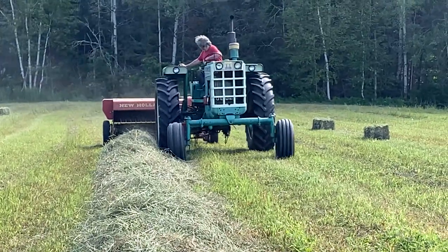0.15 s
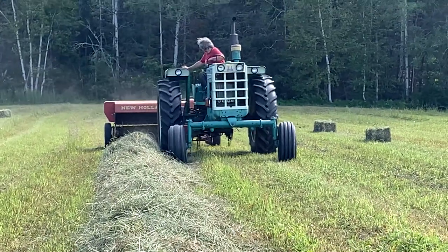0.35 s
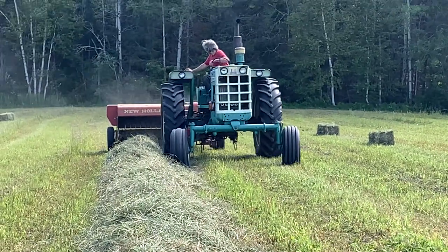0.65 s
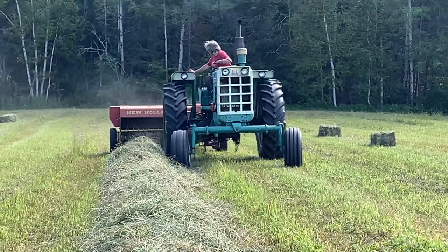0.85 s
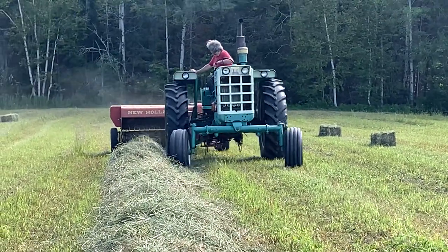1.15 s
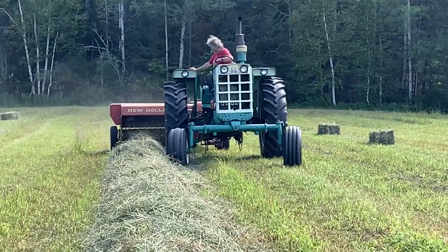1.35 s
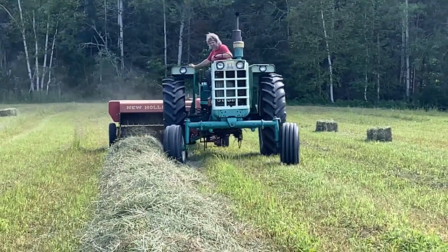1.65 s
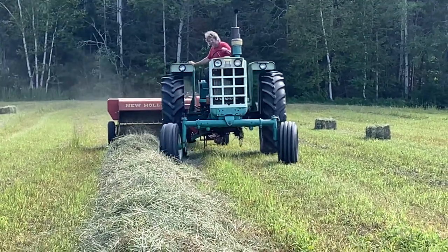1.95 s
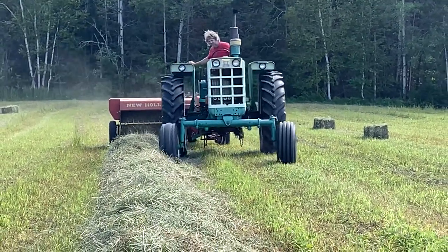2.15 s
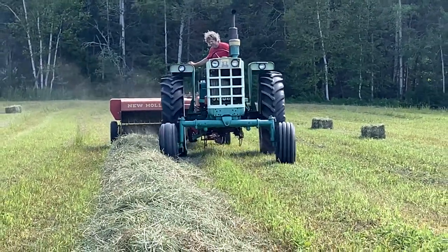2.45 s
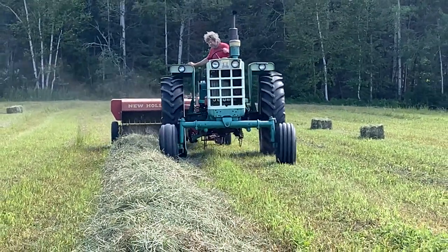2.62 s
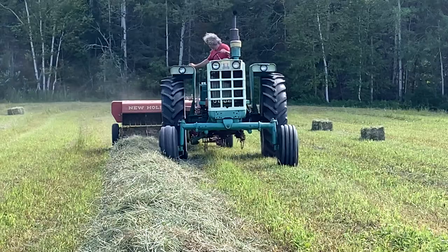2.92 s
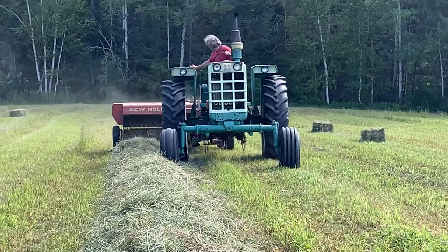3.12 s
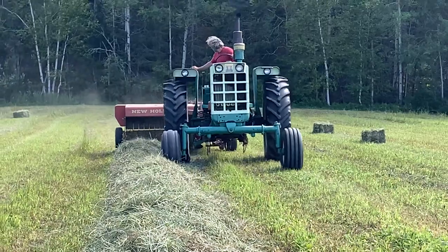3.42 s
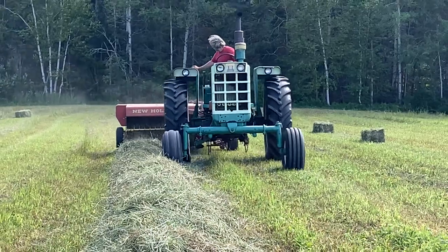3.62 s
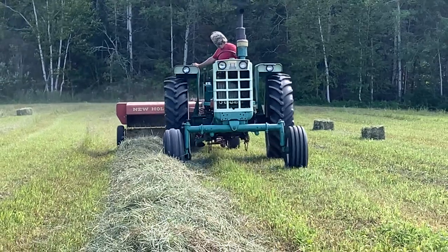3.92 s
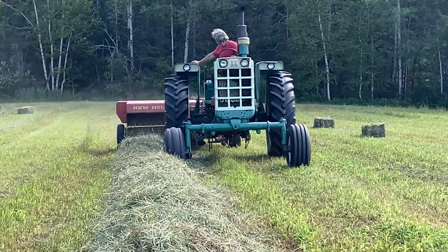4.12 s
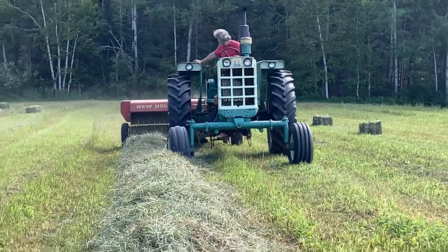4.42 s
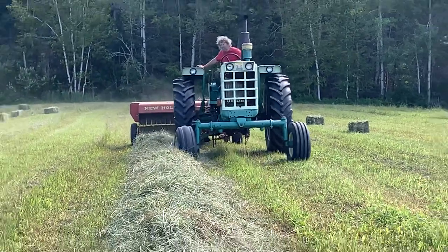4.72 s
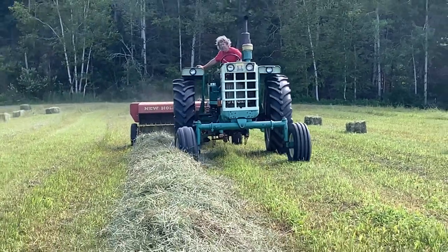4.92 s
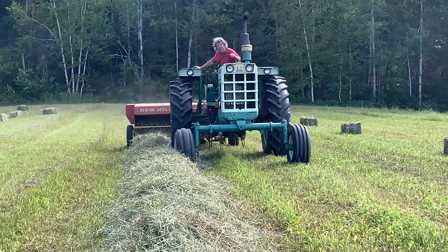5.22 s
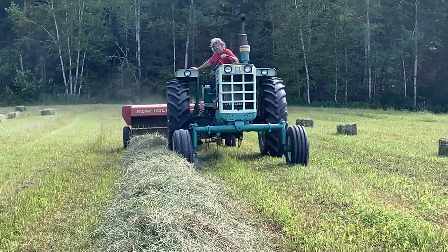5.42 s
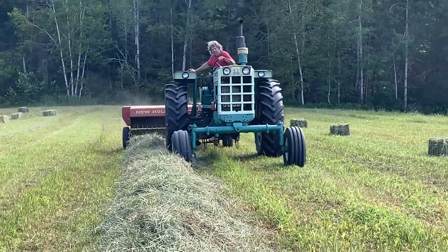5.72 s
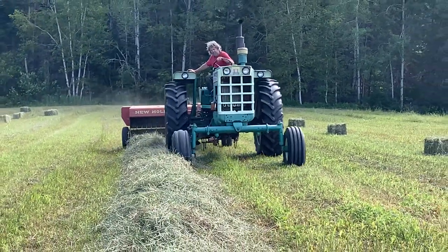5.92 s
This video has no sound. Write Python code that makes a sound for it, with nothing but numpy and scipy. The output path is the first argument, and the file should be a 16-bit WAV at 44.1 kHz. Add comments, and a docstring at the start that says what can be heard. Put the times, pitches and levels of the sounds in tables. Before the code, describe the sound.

Outdoors in an open hay field, a six-cylinder tractor approaches a fixed stereo microphone, swelling steadily. Its low, beating drone sags briefly with each baler plunger stroke, about every 1.2 seconds. Puffing exhaust, valve clatter, gear whine and a buzzing metal guard cover a fine dry hay rustle and ticking chains. Steel clacks become stronger near the end, as soft wind thumps the microphone.

```python
"""A six-cylinder tractor nears the microphone across a hay field, driving a square baler.
Plunger strokes sag the crank speed; exhaust sines beat against fan sines, shaped noise makes puffs and clatter.
Gear sines, a buzzing guard and singing drive gears join in; low noise makes the wheels thud.
Filtered noise forms the pickup's rustle, chain ticks and steel rattles; late on, a breeze buffets the microphone."""
import sys
import numpy as np
from scipy import signal
from scipy.fft import rfft, irfft, next_fast_len
from scipy.io import wavfile
from scipy.ndimage import map_coordinates

SR = 44100
rng = np.random.default_rng(int(sys.argv[2]) if len(sys.argv) > 2 else 0)


def dump_mix(stems):
    """Bounce the given channels to the path in sys.argv[1] as a 16-bit WAV at rate SR."""
    frames = np.atleast_2d(stems).T  # one column per channel
    limited = np.clip(frames, -1, 1)  # hard clip at full scale
    pcm = np.round(limited * 32767).astype(np.int16)
    wavfile.write(sys.argv[1], SR, pcm)


N = 267687

FREE_RPM = 1806.3
PRESS_S = .185  # 1/e half-width of a stroke
FEED_AFTER_S, FEED_S, FEED_SAG_RPM = .5, .19, 35.92

# plunger strokes, about 49 a minute: (time [s], speed sag [rpm], gear song re clatter [dB])
PLUNGER_STROKES = [(-.51, 74, -6), (.707, 75.76, -4.5), (1.927, 71.94, -5.5), (3.148, 75.22, -4),
                   (4.368, 82.1, -3.5), (5.586, 67.95, -10)]


def engine_speed():
    """Crankshaft rpm: each plunger stroke and the feed after it drag it below the governed speed."""
    sag_rpm = 0
    for time_s, stroke_rpm, _ in PLUNGER_STROKES:
        sag_rpm += stroke_rpm * swell(time_s, PRESS_S)
        sag_rpm += FEED_SAG_RPM * swell(time_s + FEED_AFTER_S, FEED_S)
    return FREE_RPM - sag_rpm


# exhaust lines: (multiple of the four-stroke cycle [-], nominal level re firing line [dB])
EXHAUST_LINES = [(4, -35), (5, -33.5), (6, 0.5), (7, -24.5), (8, -25), (9, -9), (11, -24), (12, -25.5),
                 (15, -25.5), (18, -33.5), (20, -31.5), (23, -42.5)]
# belt-driven fan: (blade passes per cycle [-], level re firing line [dB])
FAN_LINES = [(8.82, -8.5), (17.64, -26), (35.28, -40)]


def drone(cycle, drone_db, fan_lead_turns=0.32, shake=0.015, line_fade_db=1.5):
    """Exhaust harmonics, weak ones fading as the cylinders share the load; the fan beats against the ninth."""
    turn = 2 * np.pi * cycle
    pipe = 0
    for multiple, db in EXHAUST_LINES:
        steady = round(multiple) in (6, 9)
        fade_db = 0 if steady else line_fade_db * wobble(5)
        pipe += amp(db + fade_db) * np.sin(round(multiple) * turn)
    fan = sum(amp(db) * np.sin(passes * turn + 2 * np.pi * fan_lead_turns) for passes, db in FAN_LINES)
    return np.sqrt(2) * amp(drone_db) * (pipe + fan) * (1 + shake * wobble(15))


# exhaust puff spectrum: (frequency [Hz], relative density [dB per Hz])
PUFF_SPECTRUM = [(20, -34), (30, -27), (45, -16), (70, -5), (110, 1), (180, 0.5), (260, -3), (310, -10.5),
                 (390, -24.5), (700, -50)]


def puffs(cycle, puff_db, depth=0.56, gust_db=0.4):
    """Turbulent gas leaves the stack, pulsing with each of the six firings per cycle."""
    gas = noise() * (1 + depth * np.cos(2 * np.pi * 6 * cycle))
    jet = filtered(gas, spectrum(PUFF_SPECTRUM))
    return amp(puff_db) * unit(amp(gust_db * wobble(10)) * jet)


# engine block and bonnet: (frequency [Hz], relative density [dB per Hz])
BLOCK_SPECTRUM = [(150, -22), (390, -8), (530, -1), (780, 1), (1000, 0.5), (1400, 1.5), (1680, -1),
                  (1850, -4.5), (2020, -13.5), (2130, -6.5), (2400, -7.5), (2650, -10.5), (3400, -17.5),
                  (5200, -19.5), (16000, -59)]
# ringing panels: (frequency [Hz], width [Hz], level re block [dB])
PANEL_MODES = [(792, 24, -8.5), (1055, 11, -6.5), (1638, 27, -8)]


def clatter(cycle, load, clatter_db, loose_db=0.0, repeat_db=-15.5, drift_rad=0.73):
    """Slowly changing valve and piston ticks, loose knocks and gears ring the block and panels."""
    blend_rad = drift_rad * wobble(1.56)
    strikes = amp(loose_db + .5 * load) * noise()
    ticks = np.cos(blend_rad) * valve_pattern(cycle) + np.sin(blend_rad) * valve_pattern(cycle)
    strikes[0] += amp(repeat_db) * ticks
    strikes *= knocks(cycle)
    strikes[0] += gear_whine(cycle)
    body = spectrum(BLOCK_SPECTRUM, PANEL_MODES)
    return amp(clatter_db) * unit(ground_dip(filtered(strikes, body)))


def valve_pattern(cycle, size=8192):
    """A fine random rattle that repeats every four-stroke cycle."""
    lines = np.exp(2j * np.pi * rng.random(size // 2 + 1))
    # timing scatter weakens the high lines
    lines /= np.hypot(1, (np.arange(len(lines)) / 170) ** 2)
    return unit(np.interp(cycle % 1, np.arange(size) / size, irfft(lines), period=1))


# six cylinders in firing order: (nominal knock strength re steady clatter [-])
CYLINDER_KNOCKS = [1.3, .95, .55, .85, .3, .35]


def knocks(cycle, knock_s=0.003):
    """Each firing jolts the block as hard as its cylinder does, then the jolt decays exponentially."""
    count = len(CYLINDER_KNOCKS)
    firing, part = np.divmod(count * cycle, 1)
    since_s = part / np.gradient(count * cycle) / SR
    strength = np.take(CYLINDER_KNOCKS, firing.astype(int), mode="wrap") * amp(2.5 * wobble(90))
    return unit(1 + strength * np.exp(-since_s / knock_s))


# gears and valve train: (multiple of the cycle [-], nominal level re loose knocks [dB])
GEAR_LINES = [(30, -31), (33, -31), (36, -29), (37, -35), (39, -34), (40, -22.5), (42, -34.5), (44, -31),
              (48, -30), (50, -27), (52, -30), (53, -36), (54, -26.5), (55, -35), (58, -28), (59, -29.5),
              (62, -26), (63, -27.5), (66, -31.5), (69, -31.5), (71, -27.5), (72, -25.5), (74, -28.5),
              (75, -24.5), (82, -28), (84, -32.5), (86, -31), (87, -27), (90, -33.5), (93, -36),
              (108, -27.5), (111, -27), (117, -30)]


def gear_whine(cycle, fade_db=2.5, fade_rate_hz=2.96, backlash_cycles=0.001):
    """Meshing teeth sing on cycle multiples; backlash blurs high lines, each fades as the tractor rocks."""
    whine = 0
    for multiple, db in GEAR_LINES:
        shaken = cycle + backlash_cycles * wobble(22)
        tone = np.sin(2 * np.pi * (round(multiple) * shaken + rng.random()))
        whine += amp(db + fade_db * wobble(fade_rate_hz)) * tone
    return np.sqrt(2) * whine


def ground_dip(x, dip_hz=520, width_hz=520, far=.3, near=-.15):
    """The reflection off the stubble thins the low mids from afar and lifts them close by."""
    return x - np.linspace(far, near, N) * filtered(x, lambda f: resonance(f, dip_hz, width_hz))


# loose guard's spells: (time [s], level re clatter [dB])
BUZZ_SPELLS = [(0, -22), (.42, -26), (.6, -10), (1, -16), (1.22, -5), (1.5, -20), (1.95, -11), (2.3, -13),
               (4.2, -22), (4.4, -10), (4.88, -8), (5.2, -14), (5.5, -13), (5.98, -10), (6.07, -6)]


def buzz(clatter_db, ring_hz=1103, waver_hz=5, flutter_db=2):
    """A loose sheet-metal guard sings on one wavering note."""
    turn = 2 * np.pi * np.cumsum(ring_hz + waver_hz * wobble(25)) / SR
    return amp(clatter_db + curves(BUZZ_SPELLS)) * unit(np.sin(turn) * amp(flutter_db * wobble(14)))


def driveline(clatter_db, ring_hz=1210, width_hz=32):
    """The loaded drive gears sing whenever the plunger presses the bale."""
    press = sum(amp(db) * swell(time_s, PRESS_S) for time_s, _, db in PLUNGER_STROKES)
    song = filtered(noise(), lambda f: resonance(f, ring_hz, width_hz) ** 2)
    return amp(clatter_db) * press * unit(song)


# ground rumble: (frequency [Hz], relative density [dB per Hz])
GROUND_SPECTRUM = [(18, -38), (28, -17), (42, 7), (55, 11.5), (75, 22), (110, 2), (180, 14), (350, -51)]
# wheels drop into ruts: (time [s], level re steady rolling [dB])
WHEEL_RUTS = [(2.27, 6), (4.16, 3)]


def rolling(rolling_db, bump_db=2.5, rut_s=0.071):
    """The heavy wheels thud unevenly over the stubble, harder in the ruts."""
    bumps = noise() * amp(bump_db * wobble(11))
    rut_db = sum(db * swell(time_s, rut_s) for time_s, db in WHEEL_RUTS)
    return amp(rolling_db + rut_db) * unit(filtered(bumps, spectrum(GROUND_SPECTRUM)))


# dry stalks: (frequency [Hz], relative density [dB per Hz])
STALK_SPECTRUM = [(800, -20), (2600, -12), (4000, -4), (5300, -9), (6300, -3.5), (7000, -.5), (7600, .3),
                  (8200, -1.5), (8700, 0), (9400, -.5), (10700, -4), (12300, -3), (14300, -10.5),
                  (16000, -10)]
# pickup's spring tines: (frequency [Hz], width [Hz], level re rustle [dB])
TINE_MODES = [(4980, 120, -7), (6000, 200, -6), (6850, 90, -7), (7030, 50, -4), (7300, 200, -12),
              (11800, 80, -9)]
# windrow thick and thin: (time [s], level [dB])
WINDROW_LEVEL = [(0, 0.5), (.35, 3), (1.1, 1.5), (1.4, -0.5), (1.8, 1.5), (2.7, 0), (3.1, 2), (3.45, 1.5),
                 (3.7, -0.5), (4.4, -0.5), (5.2, -0.8), (5.55, 0.5), (6.07, 1.5)]


def hay(hay_db, grain_db=1.2, clump_db=1.23, snaps_db=-15, snap_rate_hz=220):
    """Ringing tines comb the windrow: a dense rustle with single stalks snapping in it."""
    rustle = unit(noise() * amp(grain_db * wobble(1400) + clump_db * wobble(45)))
    snaps = (rng.random(N) < snap_rate_hz / SR) * noise()
    ringing = steel_ring(rustle + amp(snaps_db) * unit(snaps))
    combed = filtered(ringing, spectrum(STALK_SPECTRUM, TINE_MODES))
    return amp(hay_db + curves(WINDROW_LEVEL)) * unit(combed)


# baler's chains and sheet steel: (frequency [Hz], relative density [dB per Hz])
STEEL_SPECTRUM = [(1200, -25), (2200, -7), (2600, -12), (2950, -5), (3250, 2), (3500, 0), (3900, -3),
                  (4450, -2), (4750, -9), (5300, -18), (6400, -20), (12000, -35)]


def chains(chain_db, link_db=2.0, slap_db=0.9):
    """Chain links and feeder forks tick densely against the baler's sheet steel."""
    ticks = noise() * amp(link_db * wobble(500) + slap_db * wobble(45))
    return amp(chain_db) * unit(filtered(steel_ring(ticks), spectrum(STEEL_SPECTRUM)))


# tines and feeder, with the plunger's knocks as the low rows near 1 kHz: (time [s], level before attack and
# decay [dB], ring [Hz], width [Hz], attack [s], t60 [s])
STEEL_RATTLES = [(.315, -56, 9500, 4000, .005, .2), (.61, -56, 6000, 3000, .005, .15),
                 (.79, -58, 6000, 1500, .003, .1), (1.05, -48, 9000, 4500, .012, .22),
                 (1.17, -54, 9500, 4000, .005, .15), (1.745, -48, 9900, 2500, .006, .17),
                 (2.245, -47, 9000, 7000, .003, .1), (2.27, -44, 4500, 3000, .006, .14),
                 (2.516, -35, 980, 1100, 0.0044, 0.19), (2.555, -45, 4300, 3000, .006, .25),
                 (2.861, -47, 6500, 3000, .003, .12), (3.13, -43, 4100, 1300, .005, 0.18),
                 (3.165, -48, 4000, 1800, .005, .2), (3.415, -46, 10200, 4000, .012, .26),
                 (3.51, -54, 10000, 4000, .003, .12), (4.20, -52, 6050, 900, .015, .9),
                 (4.298, -38, 3400, 1300, 0.0046, 0.22), (4.305, -47, 6000, 3000, .004, .2),
                 (4.41, -51, 6000, 700, 0.0047, 0.16), (4.47, -35, 3470, 1600, .009, .2),
                 (4.515, -44, 3900, 2500, .004, .2), (4.82, -37, 1200, 1200, .004, .12),
                 (4.84, -45, 9000, 4000, .005, .13), (5.484, -30.5, 3360, 2000, 0.0022, 0.083),
                 (5.484, -42, 10000, 6000, .005, .22), (5.505, -29, 1200, 1100, 0.0044, 0.18),
                 (5.518, -34, 3800, 3000, .001, 0.051), (5.586, -42, 4700, 900, .002, .08),
                 (5.608, -41, 4650, 700, .002, .1), (5.715, -41, 6600, 4500, 0.0036, 0.11),
                 (5.968, -31, 1120, 1000, .003, 0.12), (5.972, -42, 4400, 900, .002, .15),
                 (5.982, -35, 7200, 1500, .007, 0.15), (5.984, -39, 10500, 4000, .005, .15)]


def rattles(jolt_db=1.5):
    """Loose steel parts clack and chatter in uneven jolts, each with its own band and decay."""
    out = np.zeros((2, N + SR))
    t = np.arange(SR // 2) / SR
    f = np.fft.rfftfreq(len(t), 1 / SR)
    jolts = steel_ring(noise() * amp(jolt_db * wobble(900)))
    jolts = np.pad(jolts, [(0, 0), (0, SR)], mode="wrap")
    for time_s, db, ring_hz, width_hz, attack_s, t60_s in STEEL_RATTLES:
        start = round(time_s * SR)
        span = slice(start, start + len(t))
        band = resonance(f, ring_hz, width_hz) ** 2
        chatter = unit(irfft(rfft(jolts[:, span]) * band, len(t)))
        out[:, span] += chatter * amp(db - 60 * t / t60_s) * (1 - np.exp(-t / attack_s))
    return out[:, :N]


def steel_ring(x, t60_s=.07, ring_db=-10):
    """Each tick leaves a short decaying tail of countless close modes in the steelwork."""
    t = np.arange(SR // 8) / SR
    tail = rng.standard_normal(len(t)) * amp(-60 * t / t60_s)
    tail /= np.linalg.norm(tail)
    return x + amp(ring_db) * signal.fftconvolve(x, tail[None], axes=1)[:, :N]


# wind on the ports: (frequency [Hz], relative density [dB per Hz])
BUFFET_SPECTRUM = [(18, -40), (30, -22), (55, 4), (90, 1.5), (140, 4), (220, -13), (350, -31), (600, -45),
                   (1500, -60), (4000, -100)]
# breeze, stronger in the second half: (time [s], level re wind_db [dB])
BREEZE_GUSTS = [(0, -30), (3.3, -15), (3.55, -10), (4, -10), (4.2, -12), (4.3, -10), (4.39, 5), (4.49, -13),
                (5.08, -7), (5.2, 4.5), (5.35, -8), (5.52, 5), (5.82, 0), (6.07, -2)]


def wind(wind_db=-33.0, lump_db=1.0):
    """A rising breeze buffets each microphone port on its own, in soft lumps."""
    eddies = filtered(noise(), spectrum(BUFFET_SPECTRUM))
    lumps = amp(lump_db * np.array([wobble(15), wobble(16)]))
    return amp(wind_db + curves(BREEZE_GUSTS)) * unit(eddies * lumps)


# port pair: (frequency [Hz], likeness [0-1], left phase lead [rad], left minus right [dB])
PORT_PAIR = [(30, .95, 0, 0), (85, .99, .08, -1.6), (135, .99, .12, -1.4), (280, .99, 0, 1.8),
             (400, .99, 0, -.7), (620, .94, .1, -7), (860, .93, .6, -3), (1200, .91, .25, 0),
             (1850, .94, .5, -1), (2250, .9, 1.8, -4), (2560, .9, 2.7, 0), (2800, .83, 1.7, -1),
             (3300, .82, 2.15, 0), (4150, .74, 1.1, -1.7), (5000, .75, 2, 0), (6000, .75, .3, -1),
             (7000, .8, -1.1, 0), (7900, .92, -2.8, 0), (8700, .92, -3.2, 0), (10500, .89, -6.2, 0),
             (15500, .89, -12.5, 0)]


def ports(pair):
    """Direct sound reaches the two ports with a phase lead and level tilt; scatter makes them differ."""
    m = next_fast_len(N + SR // 4)
    alike, lead_rad, tilt_db = along(PORT_PAIR, np.fft.rfftfreq(m, 1 / SR))
    spread_rad = np.arccos(np.clip(alike, 0, 1)) / 2
    direct, scatter = rfft(pair, m)
    side = np.array([[1], [-1]])  # left, right
    both = direct * np.cos(spread_rad) + side * scatter * np.sin(spread_rad)
    both = both * amp(side * tilt_db / 2) * np.exp(.5j * side * lead_rad)
    return irfft(both, m)[:, :N]


# swell as the rig nears: (time [s], level [dB])
APPROACH_LEVEL = [(0, -7), (1.5, -3.5), (3, 0), (4.6, 4), (6.07, 6.5)]


def level(layer, load):
    """A layer's dB over time: louder when nearer and when working harder."""
    base_db, growth, load_db = layer
    return base_db + growth * curves(APPROACH_LEVEL) + load_db * load


def amp(db):
    """Decibels to gain."""
    return 10 ** (np.asarray(db) / 20)


def unit(x):
    """Scale to rms 1."""
    return x / np.sqrt(np.mean(x ** 2) + 1e-20)


def along(points, hz):
    """Each column of a frequency table, read on a log axis."""
    f, *cols = np.transpose(points)
    return np.squeeze([np.interp(np.log(hz + 1), np.log(f + 1), c) for c in cols])


def curves(rows):
    """One value per sample for each column after the time."""
    s, *cols = np.transpose(rows)
    return np.squeeze([np.interp(np.arange(N) / SR, s, c) for c in cols])


def wobble(rate_hz):
    """A smooth random curve, rate_hz knots a second."""
    knots = rng.standard_normal(int(N * rate_hz / SR) + 4)
    return map_coordinates(knots, [np.arange(N) * rate_hz / SR])


def swell(centre_s, length_s):
    """A Gaussian push of height 1 around a moment."""
    return np.exp(-((np.arange(N) / SR - centre_s) / length_s) ** 2)


def noise():
    """Two unrelated white noises: the direct sound and its scatter from field and trees."""
    return rng.standard_normal((2, N))


def filtered(x, response):
    """x shaped by a complex response of frequency."""
    m = next_fast_len(N + SR // 4)
    return irfft(rfft(x, m) * response(np.fft.rfftfreq(m, 1 / SR)), m)[..., :N]


def resonance(f, centre_hz, width_hz):
    """Response of one damped mode, 1 at its centre."""
    return 1j * f * width_hz / (centre_hz ** 2 - f ** 2 + 1j * f * width_hz)


def spectrum(points, modes=()):
    """Response that follows a spectrum table, with damped modes ringing on top."""
    def response(f):
        ringing = sum(amp(db) * resonance(f, hz, width_hz) for hz, width_hz, db in modes)
        return amp(along(points, f)) * (1 + ringing)
    return response


# layers: (level at mid approach, unloaded [dB], multiple of approach swell [-], extra at full load [dB])
DRONE_LAYER = (-25, 1, 0.89)
PUFF_LAYER = (-37.5, 0.94, 0.17)
CLATTER_LAYER = (-39, 1, 0.12)
ROLLING_LAYER = (-44.5, 2.24, 0.3)
CHAIN_LAYER = (-52, 1.22, 0.68)
HAY_LAYER = (-54, 1, 0.53)


def scene():
    """One crankshaft drives the whole rig; its sag in speed tells the load."""
    rpm = engine_speed()
    cycle = np.cumsum(rpm) / (120 * SR)  # two turns per four-stroke cycle
    load = (rpm.max() - rpm) / np.ptp(rpm)
    clatter_db = level(CLATTER_LAYER, load)
    tractor = puffs(cycle, level(PUFF_LAYER, load))
    tractor += clatter(cycle, load, clatter_db)
    tractor += rolling(level(ROLLING_LAYER, load))
    tractor[0] += drone(cycle, level(DRONE_LAYER, load)) + buzz(clatter_db)  # direct sound only
    baler = driveline(clatter_db) + hay(level(HAY_LAYER, load))
    baler += chains(level(CHAIN_LAYER, load)) + rattles()
    return ports(tractor + baler) + wind()


def record(dry, dip_hz=2560, dip_width_hz=220, dip_depth=.75, top_hz=15750):
    """A narrow dip near 2.5 kHz thins the sound; nothing is kept above the band limit."""
    def response(f):
        dip = 1 - dip_depth * resonance(f, dip_hz, dip_width_hz)
        return dip * (f < top_hz)
    return filtered(dry, response)


dry = scene()
out = record(dry)
dump_mix(out)
```